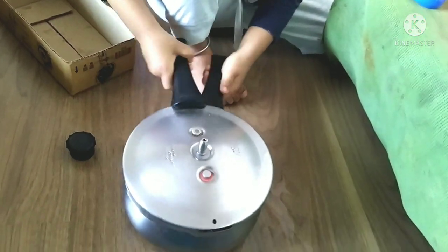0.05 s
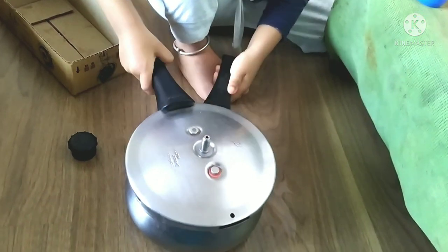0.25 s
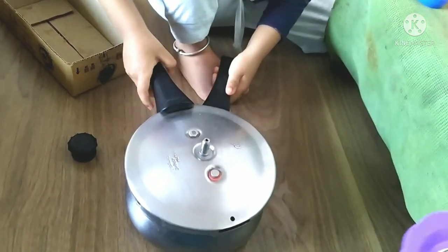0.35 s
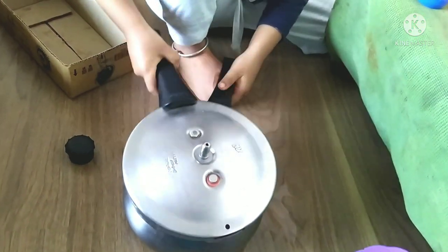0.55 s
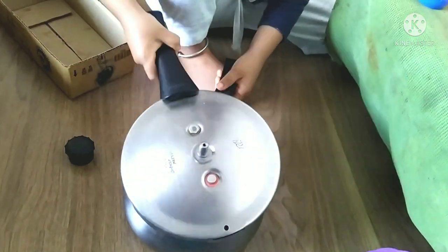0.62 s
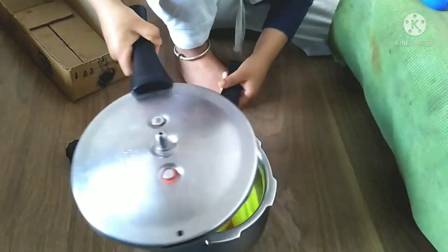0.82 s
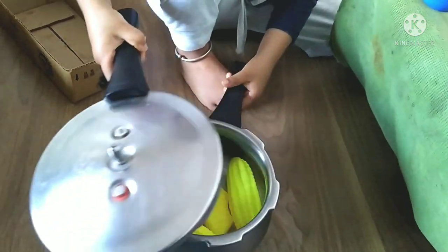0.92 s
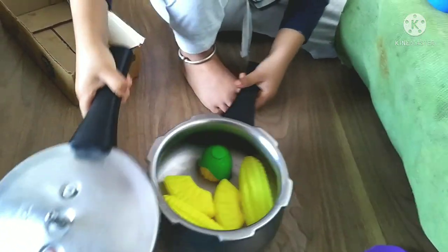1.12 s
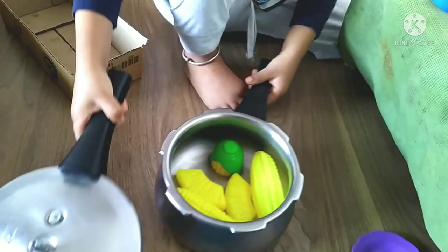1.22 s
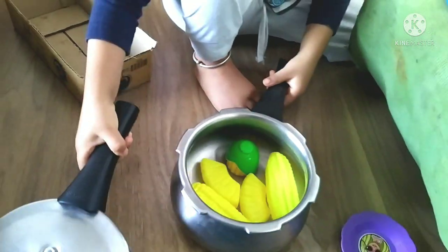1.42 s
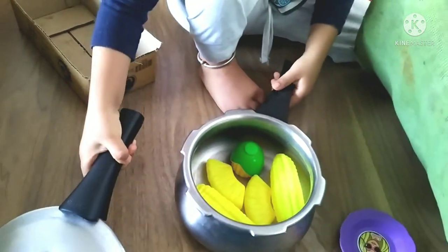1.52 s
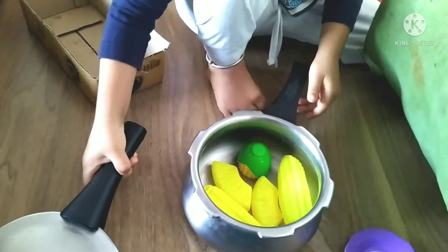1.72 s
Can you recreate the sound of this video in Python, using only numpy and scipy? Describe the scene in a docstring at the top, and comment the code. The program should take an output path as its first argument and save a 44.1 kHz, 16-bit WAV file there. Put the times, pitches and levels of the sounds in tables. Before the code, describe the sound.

Metal cooker lid twisted and lifted off with sharp clanks, a short ring, a knock and rustling.

```python
"""A quiet room with a wooden floor, a small metal cooker close to a pair of phone microphones.
The lid is twisted, clanks and scrapes on the rim, comes free and rings, knocks once as it is swung aside;
then something rustles and drags softly nearby. Contacts are random clicks that excite coloured noise and
decaying sines; the floor booms as low sines, and steady noise and a short tail make the room.
"""
import sys
import numpy as np
from scipy import signal
from scipy.fft import rfft, irfft
from scipy.io import wavfile

SR = 44100
rng = np.random.default_rng(int(sys.argv[2]) if len(sys.argv) > 2 else 0)


def log_audio(samples):
    """Write samples as a 16-bit WAV file to the path given in sys.argv[1]."""
    # one column per channel
    frames = np.atleast_2d(samples).T
    # limit to full scale, then quantise
    limited = np.clip(frames, -1, 1)
    pcm = np.round(limited * 32767).astype(np.int16)
    wavfile.write(sys.argv[1], SR, pcm)


N = 77175

# Steady room noise, its spectrum: pitch_hz, level_db (relative)
AIR_SPECTRUM = [(15, -40.5), (25, -35), (55, -11), (93, 0), (246, -4), (297, -11.5), (368, -4), (598, -23),
                (722, -11), (871, -15), (1380, -22), (2230, -25.5), (3170, -19.5), (4040, -32),
                (15500, -44.5)]
AIR_DB = -48.5
# Likeness of the room noise at left and right: pitch_hz, likeness (0 to 1)
AIR_LIKENESS = [(60, 1), (300, 0.78), (1000, 0.2), (8000, 0.48)]
ROOM_T60_S, ROOM_DB, WALL_CUT_HZ = 0.42, -14, 6800

# Soft rustle over time: time_s, level_db, low_part_db (relative to level)
RUSTLE_LEVELS = [(1.085, -42, 6), (1.095, -35.5, -10), (1.105, -42, 0), (1.133, -49.5, -4), (1.177, -49, 2),
                 (1.197, -51, -20), (1.209, -47, -2.5), (1.285, -50, 1), (1.319, -38, -6.5),
                 (1.401, -36.5, -0.5), (1.415, -40, -6.5), (1.479, -40, -0.5), (1.533, -45, -1.5),
                 (1.613, -47.5, -4), (1.731, -62.5, -13), (1.75, -55, 2)]
# Bright part of the rustle: pitch_hz, level_db (per Hz, relative)
RUSTLE_BRIGHT = [(880, -31), (1500, -19.5), (2090, -14.5), (2750, 2), (3180, 2), (5450, -5.5),
                 (7160, -13.5), (8790, -20.5), (9700, -25.5), (13100, -38), (15500, -41)]
# Dull part of the rustle: pitch_hz, level_db (per Hz, relative)
RUSTLE_DULL = [(150, -56), (250, -23), (367, -6), (407, -7.5), (519, 4), (674, -9.5), (1110, -5.5),
               (1600, -21.5), (2000, -13), (2600, -51), (4400, -120)]
# Snaps in the rustle: start_s, level_db
SNAPS = [(1.354, -31), (1.375, -27), (1.395, -22), (1.487, -33), (1.5031, -17), (1.523, -24), (1.529, -18),
         (1.54, -26), (1.549, -31), (1.552, -33), (1.578, -23.5), (1.581, -23)]
RUSTLE_PER_S, RUSTLE_UNEVEN_DB, RUSTLE_LIKENESS, RUSTLE_PAN_DB = 2900, 2.1, 0.84, -2
SNAP_HZ, SNAP_T60_S, SNAP_RING_DB = 4200, 0.0077, -12

# Tones of scraping and rustling: start_s, length_s, pitch_hz, t60_s, level_db
RUB_TONES = [(0.202, 0.013, 1140, 0.03, -33), (0.22, 0.021, 802, 0.04, -34.5),
             (0.32, 0.076, 700, 0.085, -36.5), (.516, .008, 3080, 0.021, -26),
             (1.515, 0.037, 4330, 0.0097, -42), (1.2, 0.056, 480, 0.034, -42.5),
             (0.362, 0.097, 2600, 0.095, -32), (1.3, 0.032, 1120, 0.038, -42),
             (1.2, 0.2, 2800, 0.039, -42.5), (1.5, 0.12, 3270, 0.045, -42.5),
             (1.332, 0.16, 8800, 0.011, -56.5)]

# Booms of the floor boards: start_s, level_db, pitch_hz
FLOOR_BOOMS = [(0.202, -31, 114), (0.297, -29.5, 58.4), (1.067, -52, 66)]
BOOM_T60_S = 0.12

# Broad sound of the knock: pitch_hz, level_db (per Hz, relative)
KNOCK_SPECTRUM = [(120, -47), (200, -19), (485, -7), (2030, -4), (2750, -8), (3940, 6), (4550, -1),
                  (6420, 4), (7550, -35), (8410, -6), (15000, -60)]
# Resonances of the knock: pitch_hz, level_db, t60_s
KNOCK_RINGS = [(529, -23.5, 0.051), (905, -30.5, 0.031), (1109, -27, 0.03), (2773, -12.5, 0.013),
               (3320, -19.5, 0.018), (3970, -13, 0.013), (5665, -16, 0.016)]
KNOCK_S, KNOCK_DB, KNOCK_PAN_DB, KNOCK_SOFT_HZ = 1.071, 3.5, -8, 10000
KNOCK_LEAD_S, KNOCK_LEAD_DB = 0.0005, -8   # lighter first touch
KNOCK_ECHO_S, KNOCK_ECHO_DB = 0.0045, -12
KNOCK_LAG_S = 0.00008   # the left microphone hears it later

# Broad crack of metal on metal: pitch_hz, level_db (per Hz, relative)
METAL_SPECTRUM = [(290, -50.5), (500, -8.5), (688, -12), (906, -6), (1060, -20), (1740, -36.5), (2010, -16),
                  (2730, 4), (3290, -10.5), (8210, -13), (10100, -25), (13000, -32.5), (16000, -55)]
CRACK_SIDE_DB = -9   # left-right difference of the contacts

# Lid sliding on the rim, pressure as level: time_s, level_db, low_part_db (hollow, relative to level)
SCRAPE_LEVELS = [(0, -57.5, 0), (.13, -61.5, -23), (.19, -49.5, -12), (.215, -38, -8), (.255, -42, 0.5),
                 (.268, -49.5, -7), (.3, -24.5, -31.5), (.36, -24.5, -9), (.42, -30.5, -8), (.5, -39, -2.5),
                 (.55, -42.5, -5.5), (.61, -47, -2), (.66, -44.5, 9), (.72, -43, 1), (.74, -30, 1),
                 (.765, -27.5, -18), (.775, -25, -3), (.793, -22, -7), (.803, -28, -1.5), (.83, -36, -1),
                 (.88, -45, 1), (.96, -72.5, 13), (1.05, -53.5, -3.5)]
# Hollow note of the pot under the scrape, highest as the pot opens: time_s, pitch_hz
SCRAPE_HOLLOW_PITCH = [(0, 297.9), (.6, 291.4), (.8, 421.5)]
SCRAPE_PER_S, SCRAPE_UNEVEN_DB, SCRAPE_LUMPS_DB = 9000, 2.2, 1.5   # the slips come in clumps
SCRAPE_RING_HZ, SCRAPE_RING_T60_S, SCRAPE_RING_DB = 2830, 0.0083, -18.5

# Modes of the lid: pitch_hz
LID_PITCHES = [1360, 2290, 2515, 2711, 2880, 3116, 3713, 4010, 4217, 4365, 4777, 5760, 7200, 7876, 8527]
# The same modes: seated_db (per unit force), free_db, t60_s (free)
LID_MODES = [(-43.5, -33.5, 0.16), (-45, -37, 0.44), (-41.5, -47, 0.63), (-31, -25, 0.28), (-37, -49, 0.22),
             (-42, -38.5, 1.7), (-67, -31, 0.15), (-77, -33.5, 0.26), (-71, -36, 0.23), (-44.5, -40, 0.3),
             (-40, -52, 0.25), (-46, -46.5, 0.34), (-39, -47, 0.087), (-36.5, -47, 0.092),
             (-37, -31, 0.045)]
HELD_SHARE = 0.19   # ring time left while seated
FREE_S, STOPPED_S = 0.7875, 1.066   # lid leaves the rim; its ring is stopped

# Lid meets rim: start_s, level_db, hollow_hz, hollow_db, ring_hz, ring_db, ping_hz, ping_db, crack_db,
# pan_db (left minus right), chatter_s, treble_db, ping_t60_s; inner levels are relative to level_db
CLANK_BLOWS = [(0.055, -38, 239, -8.5, 2810, -2, 8700, -10, -4.5, -3.5, 0.0034, 0.5, 0.03),
               (0.2038, -20, 417, -8.5, 2900, 0, 5630, -12, -1, -2.5, 0.0052, -6.5, .05),
               (0.24, -31.5, 340, -3, 2630, -15, 5600, -15, -1.5, 4, 0.0037, 1.5, .04),
               (.278, -10, 280, -30, 2680, -4, 4660, -13, -3.5, 4, 0.0026, 4.5, 0.082),
               (0.2811, -11, 284, -34, 2676, 2, 4540, -22, -10.5, 2, 0.0061, 2, 0.086),
               (0.2996, -4, 333, -11.5, 2798, -4.5, 5050, -13.5, -5, 4, 0.0065, 3.5, 0.055),
               (0.3041, -9, 325, -25, 2830, -10.5, 6600, -28, -3, 4, 0.0039, 5, 0.034),
               (0.5161, -11.5, 263, -8.5, 2923, -6.5, 4700, -7.5, -7, 3.5, 0.007, 4.5, 0.091),
               (0.621, -12, 238.5, 0, 2770, 1, 8100, -5.5, -2.5, -1, 0.0056, -1, 0.036),
               (.678, -24, 400, 1, 2700, 3.5, 4300, -20, -14, -2, 0.0035, -8, .04),
               (0.683, -16, 288, -4.5, 2710, -7, 7800, -5.5, -7, -0.5, 0.0078, 4, .02),
               (0.7136, -24, 266, -15, 2770, -8, 4350, -5, -5, -7, 0.0048, 5, 0.045),
               (0.7286, -10, 338, -9.5, 2654, -9, 5700, -12, -5.5, 2, 0.0055, 2, 0.046),
               (0.737, -11, 448, -10, 2730, -6.5, 6600, -10, -5.5, 1, 0.007, 2, .03),
               (0.7545, -20, 445, -5, 2700, 6, 4920, -8.5, -4, -4, .006, 8, .06),
               (0.773, -14, 388, -2.5, 2705, -10, 4200, -11, 0.5, -0.5, 0.01, -2, .04),
               (0.779, -12.5, 468, -15, 2715, 0.5, 5760, -11, -1.5, -2, 0.0086, -4.5, 0.04),
               (.784, -18, 440, -14, 2730, -20, 6040, -12, -1, -6, .003, 7.5, 0.018),
               (0.7864, -8.5, 518, -11.5, 2700, 1, 6800, -24, -9, -3.5, 0.0017, -7, 0.052)]
CLANK_PER_S, CLANK_UNEVEN_DB, CHATTER_POWER = 16000, 1.35, 0.96
RING_T60_S, HOLLOW_T60_S = 0.062, 0.064
UPPER_HOLLOW_RATIO, UPPER_HOLLOW_DB = 1.55, -9
TWIN_RATIO, TWIN_DB = 1.022, -7.5   # close twin of a ring, beating with it
WALL_HZ, WALL_DB, WALL_T60_S = 908, -17.5, 0.034   # wall of the pot

# Two microphone ports hearing the cooker: pitch_hz, level_db (left minus right), phase_rad (left leads)
MICROPHONE_PORTS = [(700, -0.5, 0.074), (1690, 0, 1), (2700, -2, .5), (3990, -2, 0), (5500, 2, 0.062),
                    (9000, 2, 0), (14000, -2, 0.55)]
DULL_HZ, DULL_PER_DB = 8400, 0.26   # treble sinks faster than the level
TOP, CUTOFF_HZ = 0.75, 16500


def amp(db):
    """Decibels to amplitude."""
    return 10 ** (np.asarray(db) / 20)


def rms_one(x):
    """Scale to an rms of 1."""
    return x / np.sqrt(np.mean(x ** 2) + 1e-20)


def in_time(rows):
    """Every column after the first, drawn as straight lines over time."""
    times, *columns = np.transpose(rows)
    return [np.interp(np.arange(N) / SR, times, column) for column in columns]


def at_hz(points, hz):
    """A table read at the given pitches, straight between points on a log pitch scale."""
    points = np.array(points)
    return np.interp(np.log(hz + 1), np.log(points[:, 0]), points[:, 1])


def low_pass(x, hz):
    """Gentle second-order treble cut."""
    return signal.sosfilt(signal.butter(2, hz, fs=SR, output="sos"), x)


def colour(x, spectrum, size=4096):
    """Causal minimum-phase filter of unit energy with the given spectrum."""
    hz = np.arange(size // 2 + 1) * SR / size
    lowest_hz, lowest_db = spectrum[0]
    # 30 dB down an octave below the first point, flat beyond the last
    db = at_hz([(lowest_hz / 2, lowest_db - 30), *spectrum], hz)
    cepstrum = irfft(db * np.log(10) / 20, size)
    cepstrum[1:size // 2] *= 2
    cepstrum[size // 2 + 1:] = 0
    response = irfft(np.exp(rfft(cepstrum)), size)
    response = response / np.sqrt(np.sum(response ** 2))
    return signal.fftconvolve(np.atleast_2d(x), response[None], axes=1)[:, :x.shape[-1]]


def duller(x, db):
    """The softer the moment, the less treble."""
    low = low_pass(x, DULL_HZ)
    return low + (x - low) * amp(DULL_PER_DB * (db - db.max()))


def click_at(s, size=N):
    """One unit sample at the given second."""
    return 1.0 * (np.arange(size) == int(s * SR))


def grains(per_s, uneven_db, size):
    """Random clicks of uneven size and either sign; rms 1."""
    sizes = amp(uneven_db * np.minimum(rng.exponential(1, size), 5))
    sizes = sizes * rng.choice([-1, 1], size)
    return rms_one(sizes * (rng.random(size) < per_s / SR))


def ring(clicks, hz, t60):
    """A unit click sets a decaying sine of height 1 ringing."""
    r, w = amp(-60 / (t60 * SR)), 2 * np.pi * hz / SR
    return signal.lfilter([0, np.sin(w)], [1, -2 * r * np.cos(w), r * r], clicks + 1e-18)


def twins(clicks, hz, t60):
    """A mode and its slightly higher, weaker twin, which beat together."""
    return ring(clicks, hz, t60) + amp(TWIN_DB) * ring(clicks, TWIN_RATIO * hz, t60)


def pan(db):
    """Gains for left and right that differ by db."""
    return amp([[db / 2], [-db / 2]])


def spread(mid, side, db):
    """Stereo pair from a middle and a side at the given level."""
    return mid + amp(db) * side * np.array([[1], [-1]])


def part_alike(mid, side, alike):
    """Stereo pair from two independent signals with the given left-right likeness."""
    opposite = side * np.array([[1], [-1]])
    return np.sqrt(1 + alike) * mid + np.sqrt(1 - alike) * opposite


def air():
    """Steady room noise, most alike at both microphones in the bass."""
    hz = np.arange(N // 2 + 1) * SR / N
    noise = rfft(rng.standard_normal((2, N)))
    mid, side = noise * amp(at_hz(AIR_SPECTRUM, hz)) * (hz > 20)
    alike = np.clip(at_hz(AIR_LIKENESS, hz), 0, 1)
    return amp(AIR_DB) * rms_one(irfft(part_alike(mid, side, alike), N))


def room(x):
    """Reflections as a dying noise tail, separate for each side, after a 3 ms gap."""
    t = np.arange(SR // 2) / SR
    decay_db = -60 * t / ROOM_T60_S
    noise = low_pass(rng.standard_normal((2, len(t))), WALL_CUT_HZ)
    tail = duller(noise, decay_db) * amp(decay_db) * (t > .003)
    tail = tail / np.sqrt(np.sum(tail ** 2) / 2)
    high = signal.sosfilt(signal.butter(2, 400, "high", fs=SR, output="sos"), x)
    return amp(ROOM_DB) * signal.fftconvolve(high[None], tail, axes=1)[:, :N]


def rustle():
    """Random grains with a few ringing snaps, heard as a bright part and a dull part."""
    fade_in = (RUSTLE_LEVELS[0][0] - .015, -90, 0)
    db, low_db = in_time([fade_in] + list(RUSTLE_LEVELS))
    mid, side = grains(RUSTLE_PER_S, RUSTLE_UNEVEN_DB, (2, N))
    force = part_alike(mid, side, RUSTLE_LIKENESS) / np.sqrt(2)
    snaps = np.zeros(N)
    for start_s, snap_db in SNAPS:
        snaps[int(start_s * SR)] = amp(snap_db)
    bright = duller(colour(amp(db) * force + snaps, RUSTLE_BRIGHT), db)
    bright = bright + amp(SNAP_RING_DB) * ring(snaps, SNAP_HZ, SNAP_T60_S)
    dull = colour(amp(db + low_db) * force, RUSTLE_DULL)
    return pan(RUSTLE_PAN_DB) * (bright + dull)


def rubs():
    """Short strokes of grains, each through one resonance."""
    out, t = np.zeros((2, N)), np.arange(N) / SR
    for start_s, length_s, hz, t60, db in RUB_TONES:
        progress = np.clip((t - start_s) / length_s, 0, 1)
        stroke = np.abs(np.sin(np.pi * progress)) ** .5
        contacts = spread(*grains(1500, 2.1, (2, N)), -11.0)
        out += amp(db) * stroke * rms_one(ring(contacts, hz, t60))
    return pan(RUSTLE_PAN_DB) * out


def floor_booms():
    """Softened blows set the floor boards ringing low."""
    return sum(amp(db) * ring(low_pass(click_at(s), 250), hz, BOOM_T60_S) for s, db, hz in FLOOR_BOOMS)


def knock():
    """One dry knock: first touch, main blow and close echo excite a broad sound and short resonances."""
    sides = []
    for s in (KNOCK_S + KNOCK_LAG_S, KNOCK_S):
        touch = amp(KNOCK_LEAD_DB) * click_at(s - KNOCK_LEAD_S)
        echo = amp(KNOCK_ECHO_DB) * click_at(s + KNOCK_ECHO_S)
        sides.append(click_at(s) - touch - echo)
    softening = signal.butter(6, KNOCK_SOFT_HZ, fs=SR, output="sos")
    click = signal.sosfilt(softening, np.array(sides))
    body = sum(amp(db) * ring(click, hz, t60) for hz, db, t60 in KNOCK_RINGS)
    return pan(KNOCK_PAN_DB) * (amp(KNOCK_DB) * colour(click, KNOCK_SPECTRUM) + body)


def scrape():
    """Dense slips give a broad hiss, the main ring and the pot's hollow; also returns the force on the lid."""
    fade_out = (SCRAPE_LEVELS[-1][0] + 0.19, -120, 0)
    db, low_db = in_time(SCRAPE_LEVELS + [fade_out])
    lumps = SCRAPE_LUMPS_DB * rms_one(low_pass(rng.standard_normal(N), 44))
    force, side = amp(db + lumps) * grains(SCRAPE_PER_S, SCRAPE_UNEVEN_DB, (2, N))
    hiss = duller(colour(spread(force, side, CRACK_SIDE_DB), METAL_SPECTRUM), db)
    main_ring = amp(SCRAPE_RING_DB) * ring(force, SCRAPE_RING_HZ, SCRAPE_RING_T60_S)
    # the hollow is narrow noise around a moving pitch
    hz, = in_time(SCRAPE_HOLLOW_PITCH)
    phase = 2 * np.pi * np.cumsum(hz) / SR
    slow = low_pass(rng.standard_normal((2, N)), 92)
    hollow = rms_one(slow[0] * np.cos(phase) + slow[1] * np.sin(phase))
    return hiss + main_ring + amp(db + low_db) * hollow, force


def clanks():
    """Each clank is a dying chatter of contacts with rings and hollow; also returns the force on the lid."""
    span = SR // 4
    out, force = np.zeros((2, N + SR)), np.zeros(N + SR)
    t, push = np.arange(span) / SR, click_at(.0015, size=span)
    hollow_band = signal.butter(3, [180, 800], "band", fs=SR, output="sos")
    for (start_s, db, hollow_hz, hollow_db, ring_hz, ring_db, ping_hz, ping_db,
         crack_db, pan_db, chatter_s, treble_db, ping_t60) in CLANK_BLOWS:
        dying = np.exp(-(t / max(chatter_s, .001)) ** CHATTER_POWER)
        hits, side = grains(CLANK_PER_S, CLANK_UNEVEN_DB, (2, span)) * dying * amp(db)
        sound = amp(crack_db) * colour(spread(hits, side, CRACK_SIDE_DB), METAL_SPECTRUM)
        sound += (sound - low_pass(sound, 6100)) * (amp(treble_db) - 1)
        sound += amp(db + ring_db) * twins(push, ring_hz, RING_T60_S)
        sound += amp(db + ping_db) * twins(push, ping_hz, ping_t60)
        sound += amp(db + WALL_DB) * ring(push, WALL_HZ, WALL_T60_S)
        upper = ring(push, UPPER_HOLLOW_RATIO * hollow_hz, HOLLOW_T60_S / 2)
        hollow = ring(push, hollow_hz, HOLLOW_T60_S) + amp(UPPER_HOLLOW_DB) * upper
        hollow = signal.sosfilt(hollow_band, hollow)
        i = int((start_s - .001) * SR)   # chatter begins 1 ms early
        out[:, i:i + span] += pan(pan_db) * sound + amp(db + hollow_db) * hollow
        force[i:i + span] += hits
    return out[:, :N], force[:N]


def lid(force):
    """Lid modes ring short under rim forces, and long from the parting blow until they are stopped."""
    held, free = np.zeros(N), np.zeros(N)
    parting = click_at(FREE_S)
    for hz, (seated_db, free_db, t60) in zip(LID_PITCHES, LID_MODES):
        held += amp(seated_db) * ring(force, hz, HELD_SHARE * min(t60, .5))
        free += amp(free_db) * ring(parting, hz, t60)
    since_stop = np.maximum(np.arange(N) / SR - STOPPED_S, 0)
    return held + np.exp(-since_stop / 0.0046) * free


def ports(x):
    """Level and phase differ between the two microphone ports, by pitch."""
    hz, table = np.arange(N // 2 + 1) * SR / N, np.array(MICROPHONE_PORTS)
    level = at_hz(table[:, [0, 1]], hz) * np.log(10) / 20
    phase = at_hz(table[:, [0, 2]], hz)
    half = (level + 1j * phase) / 2   # half to each side, with opposite signs
    return irfft(rfft(x) * np.exp(half * np.array([[1], [-1]])), N)


def scene():
    """The cooker through the two ports, the knock and floor, their room tail, the rustle and the air."""
    hits, hit_force = clanks()
    slide, slide_force = scrape()
    metal = hits + slide + lid(hit_force + slide_force)
    blow = knock() + floor_booms()
    tail = room((metal + blow).mean(axis=0))
    return ports(metal) + blow + tail + rustle() + rubs() + air()


def record(dry):
    """Peaks are rounded, then the top of the treble is cut."""
    rounded = TOP * np.tanh(dry / TOP)
    return signal.sosfilt(signal.cheby2(12, 60, CUTOFF_HZ, fs=SR, output="sos"), rounded)


dry = scene()
out = record(dry)
log_audio(out)
```